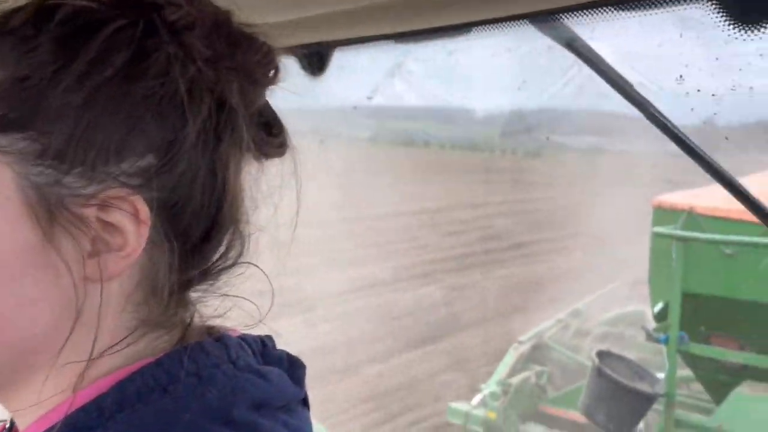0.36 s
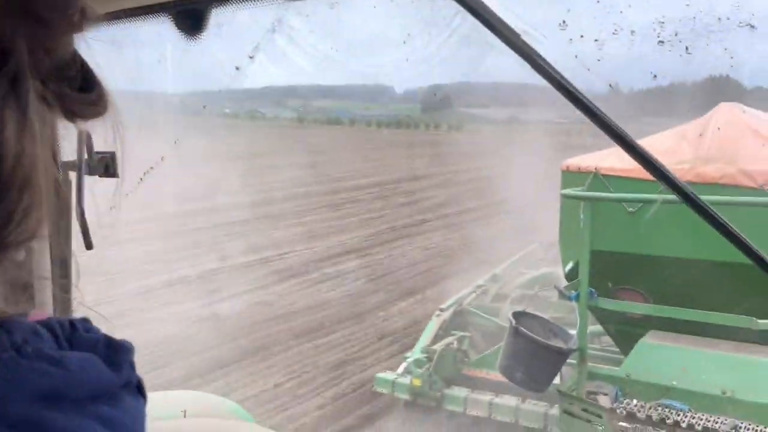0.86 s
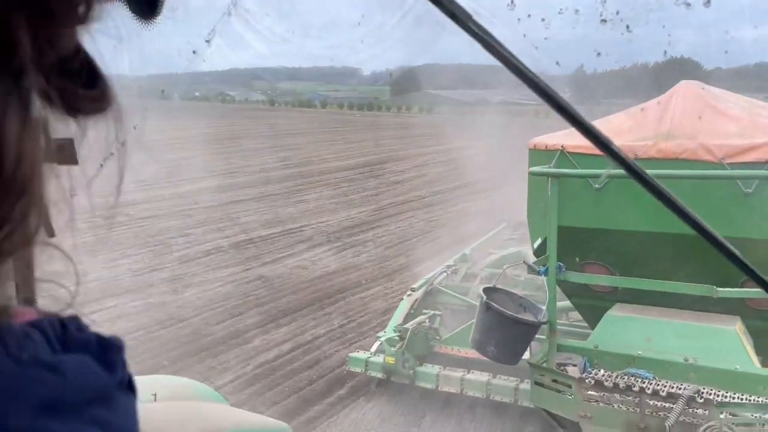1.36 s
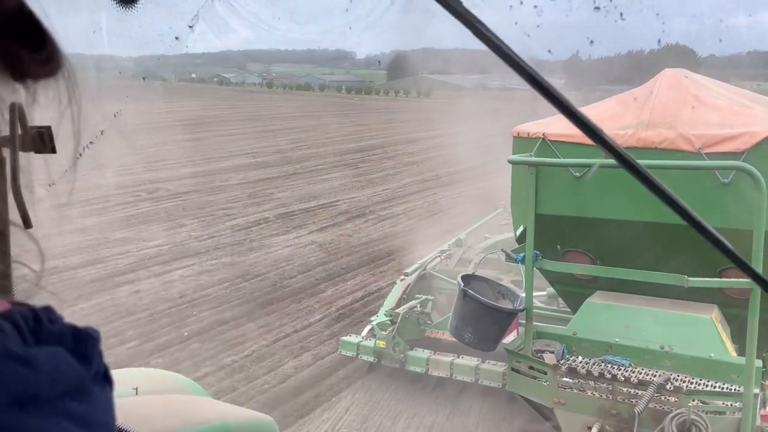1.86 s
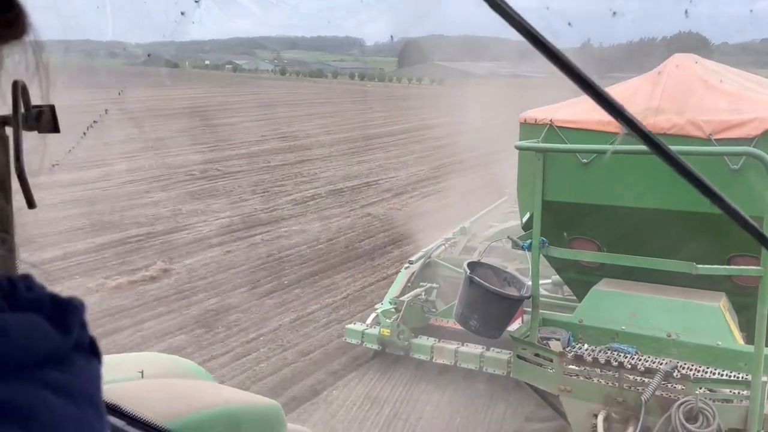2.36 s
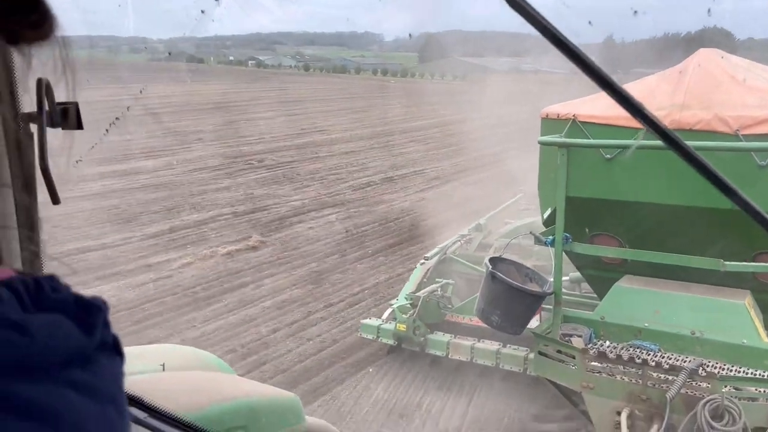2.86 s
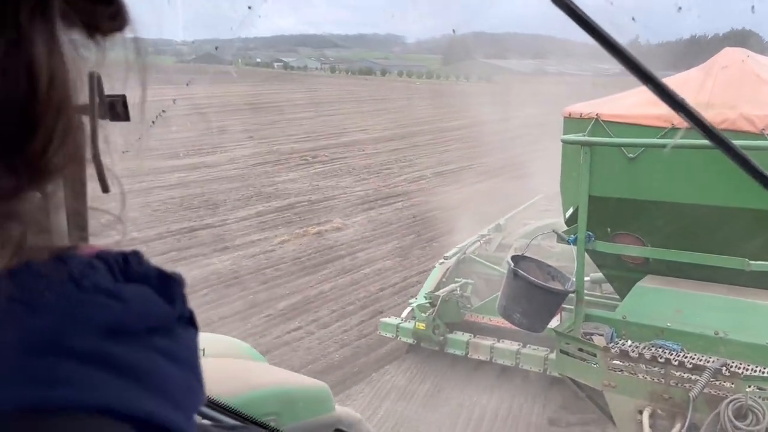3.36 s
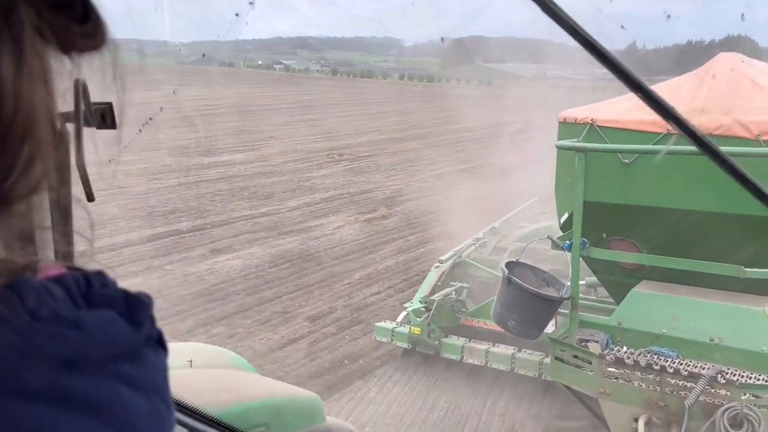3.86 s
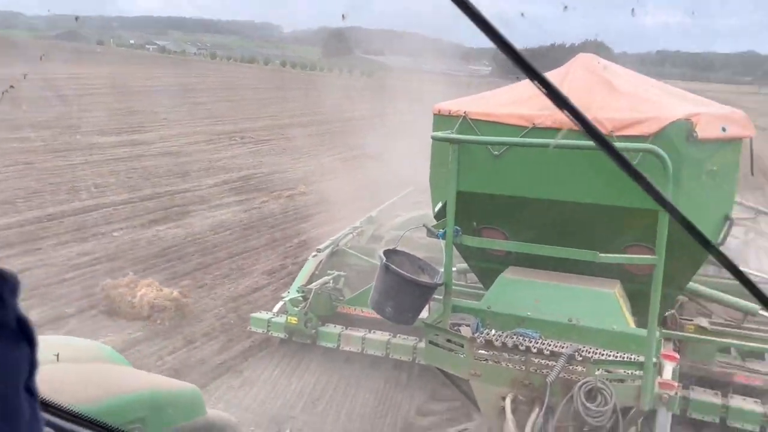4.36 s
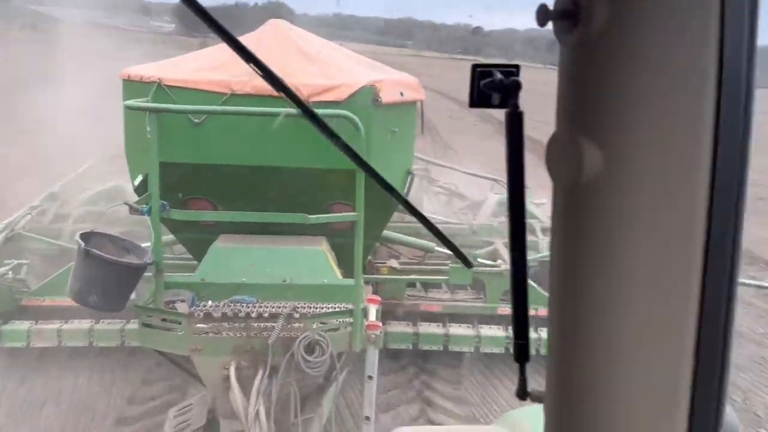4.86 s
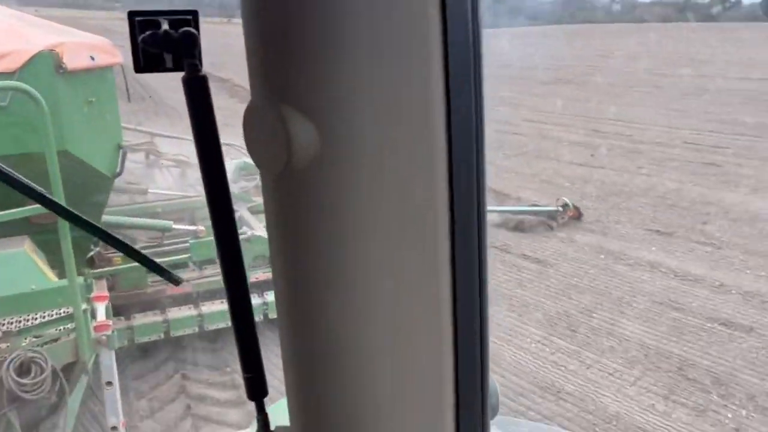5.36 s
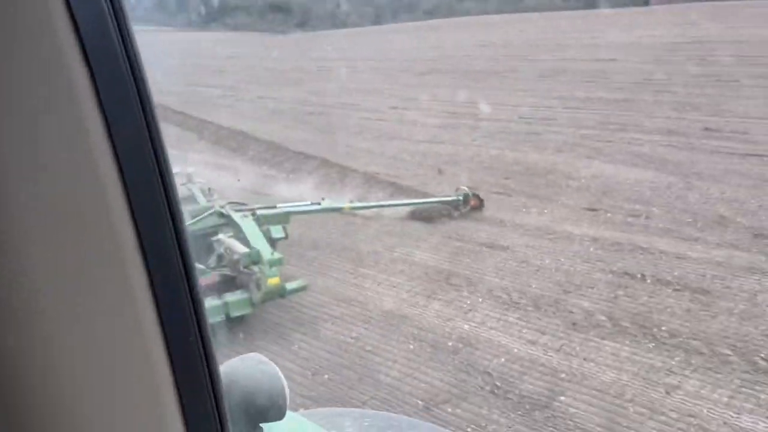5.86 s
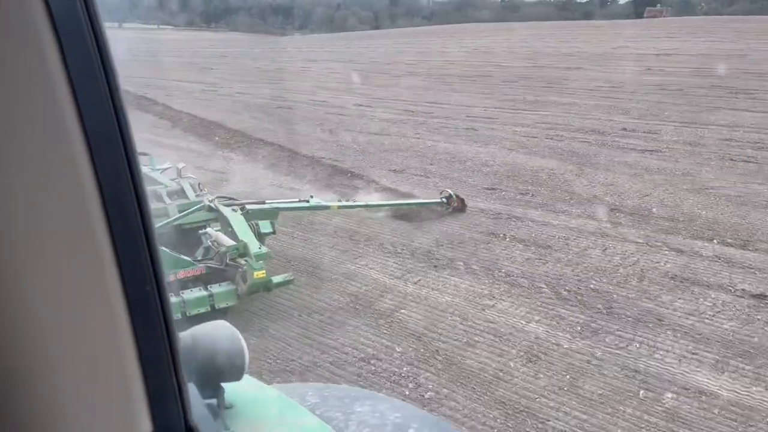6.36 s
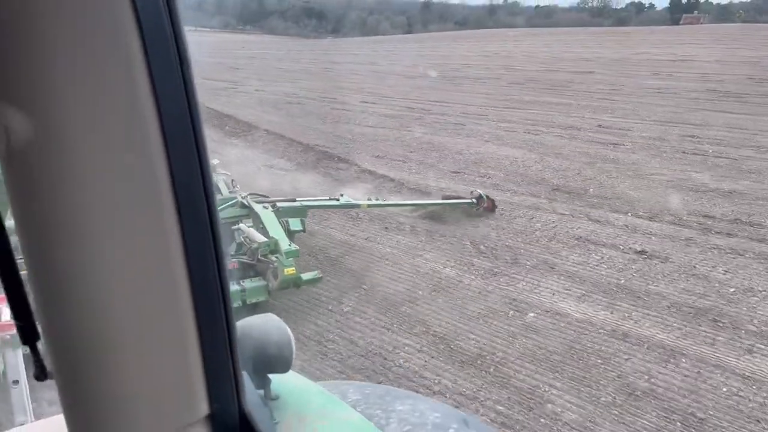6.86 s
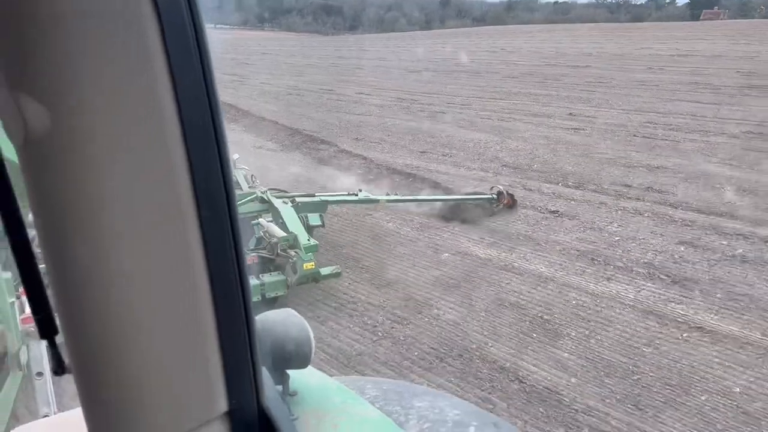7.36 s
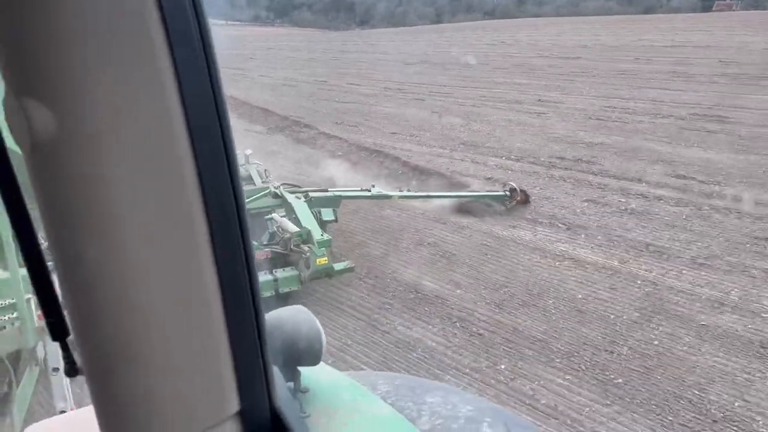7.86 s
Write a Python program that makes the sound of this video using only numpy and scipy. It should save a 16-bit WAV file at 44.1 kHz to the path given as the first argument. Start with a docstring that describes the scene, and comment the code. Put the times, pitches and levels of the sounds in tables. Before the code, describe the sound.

A deep, even engine boom fills a tractor cab, layered with blower hum, shifting gear whines and faint rattling panels as it works a field.

```python
"""A six-cylinder diesel drones under load in a closed tractor cab while it pulls a seed drill.
Engine, blower and whines are sines that waver by chance; the engine's pitch also carries pumps and gears.
The whines swell and fade as the phone moves through standing waves. The frame rumbles and the cab rings,
both as shaped noise, and loose trim rattles as short fading rings. Around five seconds the phone turns
to the other window, which shifts the balance of left and right."""
import sys
import numpy as np
from scipy import signal
from scipy.fft import irfft, next_fast_len
from scipy.io import wavfile
from scipy.ndimage import uniform_filter1d

SR = 44100
rng = np.random.default_rng(int(sys.argv[2]) if len(sys.argv) > 2 else 0)


def generate_wav(sig):
    """Save sig (samples, or channels by samples) to the path in sys.argv[1] as 16-bit PCM at SR."""
    pcm = np.round(np.clip(np.atleast_2d(sig).T, -1, 1) * 32767).astype(np.int16)
    wavfile.write(sys.argv[1], SR, pcm)


def invert_db(level):
    """Linear amplitude ratio for a level in decibels (20 dB per decade), elementwise."""
    return 10 ** (np.asarray(level, dtype=float) / 20)


N = 363825
T = np.arange(N) / SR


def curve(table):
    """Columns of a time table, joined by straight lines."""
    time_s, *columns = np.transpose(table)
    return [np.interp(T, time_s, column) for column in columns]


def walk(rate_hz):
    """A random level that takes a new value every 1 / rate_hz s, smoothed twice; spread near 1."""
    hold = int(SR / rate_hz)
    steps = np.repeat(rng.standard_normal(N // hold + 1), hold)
    smooth = uniform_filter1d(uniform_filter1d(steps, hold), hold)
    return 1.43 * smooth[:N]


def tone(cycles, gain, pan_db, lead):
    """A sine of given rms in two microphones: left minus right pan_db, left ahead by lead radians."""
    side = np.array([[.5], [-.5]])
    phase = 2 * np.pi * (cycles + rng.random()) + side * lead
    return np.sqrt(2) * gain * invert_db(side * pan_db) * np.sin(phase)


def ports():
    """Pitch axis, and how a shared and an opposed noise reach the left and right microphones."""
    # how the two microphones hear noise: pitch_hz, left_minus_right_db, likeness (0-1), left_lead_radians
    hearing = [(59.7, 3, 0.95, 0), (110, 1, 0.99, 0.1), (151, -1, .86, 0.1), (222, -1.5, .92, 0.43),
               (325, -3.5, 0.61, 0), (453, 1.5, 0.8, -1), (614, -2.5, .3, -0.65), (900, -0.5, 0.1, 1.8),
               (1510, -3.5, 0.4, 3.5), (1860, 2, .62, 7), (3520, 1.5, .5, 7), (4940, 5.5, 0.3, 6.5),
               (7340, 1.5, .6, 3.5), (7790, -1.5, 1, 3), (8770, 0.5, 1, 3), (9540, 0, .5, 2),
               (11000, 0, 0.98, 0.5), (13000, 0, 0.99, 0.5), (14000, 0.5, .5, -3.5)]
    hz = np.maximum(np.fft.rfftfreq(next_fast_len(N), 1 / SR), 1)
    port_hz, *columns = np.transpose(hearing)
    pan_db, like, lead = (np.interp(np.log(hz), np.log(port_hz), column) for column in columns)
    like = np.clip(like, 0, 1)
    sign = np.array([[1], [-1]])
    ear = invert_db(sign * pan_db / 2) * np.exp(.5j * sign * lead)
    return hz, ear * np.sqrt(1 + like), sign * ear * np.sqrt(1 - like)


def stereo_noise(gain, mics):
    """Noise of given gain per root Hz, as alike left and right as the microphones make it."""
    hz, shared, opposed = mics
    size = next_fast_len(N)
    real, imag = rng.standard_normal((2, 2, len(hz)))
    mid, side = (real + 1j * imag) * gain(hz) * np.sqrt(size * SR / 8)
    return irfft(mid * shared + side * opposed, size)[:, :N]


def rumble(cycles, mics):
    """Half-octave noise bands sway apart; the upper ones also jolt together and throb once per six firings."""
    # rumble of frame and panels, fan rush on top: pitch_hz, level_db (per Hz)
    spectrum = [(20, -71), (28, -62.5), (35, -52), (70, -50), (160, -50.5), (345, -56), (375, -58),
                (600, -64), (1000, -68.5), (2200, -73.5), (4300, -79.5), (6000, -87.5), (8000, -92),
                (11000, -93.5), (13300, -100), (15200, -106)]
    out = 0
    knot_hz, knot_db = np.transpose(spectrum)
    shared_db = .4 * np.cos(2 * np.pi * cycles / 6) + .6 * walk(5)
    for band in range(19):
        def gain(hz):
            # neighbouring bands fade into each other at constant power
            share = np.cos(np.pi / 2 * np.clip(2 * np.log2(hz / 31.25) - band, -1, 1))
            return share * invert_db(np.interp(np.log(hz), np.log(knot_hz), knot_db))
        sway_db = .3 * walk(1.5) + .7 * walk(5) + 0.93 * walk(11)
        sway_db = sway_db + shared_db * (band > 7)  # bands from 500 Hz up
        out = out + invert_db(sway_db) * stereo_noise(gain, mics)
    return out


def cab(turn, load, mics):
    """Cab resonances: peaks of noise that waver one by one; load and the phone's turn shift their balance."""
    # resonances: pitch_hz, width_hz, level_db (per Hz), gained_under_full_load_db, gained_after_turn_db
    resonances = [(104.5, 14, -40, -1.5, 1), (137.5, 24, -45, 2, -4), (214.6, 25, -48.5, 3.5, -5),
                  (245.3, 25, -54, 10, 0.5), (328.2, 40.4, -53.5, 8, -1), (553, 83, -61.5, -3, -2),
                  (743, 170, -65.5, -3, -10), (1111, 86, -67, -2, -9.5), (1472, 270, -70, 0, -0.5),
                  (1874, 200, -72, 0.5, -9), (2840, 270, -78, -1.5, -5.5), (4760, 320, -83, -1, -2),
                  (7870, 150, -88.5, 1, -0.5), (8700, 350, -87, 2, -4), (9600, 200, -91.5, -1.5, 0.5)]
    out = 0
    for mode_hz, width_hz, level_db, load_db, turn_db in resonances:
        def peak(hz):
            return 1 / np.sqrt(1 + (2 * (hz - mode_hz) / width_hz) ** 4)
        ring = stereo_noise(peak, mics)
        out = out + ring * invert_db(level_db + load_db * load + turn_db * turn + 1.4 * walk(4))
    return out


def trim(count):
    """Loose panels: a few louder knocks among many faint rattles, each a short buzzing ring with a soft onset."""
    # louder knocks: start_s, pitch_hz, level_db, time_to_fall_60_db_s
    knocks = [(1.478, 1354, -30, 0.12), (3.19, 1933, -29, .05), (3.19, 2770, -36, .04),
              (3.735, 1930, -31.5, 0.17), (4.35, 5140, -38, 0.063), (5.45, 1583, -34.5, 0.48),
              (6.42, 1057, -32, 0.14), (7.27, 4760, -39, 0.06), (7.27, 5350, -42, 0.049)]
    chance = rng.random((count + len(knocks), 5))
    rattles = []
    for when, pitch, loudness, length, _ in chance[:count]:
        level_db = -39 - 17 * pitch + 2.9 * np.log(loudness)
        rattles.append((when * T[-1], 1000 * 6.5 ** pitch, level_db, 0.033 + 0.22 * length ** 2))
    out = np.zeros((2, N + SR // 2))
    t = T[:SR // 6]  # every ring is cut off after a sixth of a second
    for (start_s, hz, level_db, t60_s), pan in zip(knocks + rattles, chance[:, 4]):
        envelope = invert_db(level_db - 60 * t / t60_s) * (1 - np.exp(-t / 0.0021))
        buzz = 0.8 * np.sin(2 * np.pi * (25 + 40 * pan) * t)
        ring = envelope * np.sin(2 * np.pi * hz * t + buzz)
        start = int(start_s * SR)
        out[:, start:start + len(t)] += ring * invert_db(np.array([[1], [-1]]) * (6.5 * pan - 3))
    return out[:, :N]


def whines(cycles, turn):
    """Pump and gear whines follow the engine, whistles do not; each rests low and rises on soft plateaus."""
    # one row for each pump harmonic, gear mesh and whistle in turn: resting_db,
    # left_minus_right_db and left_lead_radians before the turn, the same two after it
    whine_rows = [(-55, 6.5, 0.5, 0.5, -1.0), (-62, -4.5, 2.3, 4, 0.2), (-53, -6, 0, 2.0, 1.9),
                  (-53, -5.0, -2, -3.0, -1.8), (-63, 4, -0.5, 4.5, 0.6), (-66, -1, -0.5, 7.0, -0.91),
                  (-63.5, -3, 0, 0.5, 0.1), (-58.5, -2.5, -0.6, -1, 1.9), (-76, -0.5, 2, 3.0, 0.8),
                  (-46.5, 0.5, -1.2, 3.5, 1.5), (-62.5, 1, 0.4, -7.5, -0.84),
                  (-60.5, 0, 0.5, 0, 0.1),(-56, -1.5, -1.7, -1, 1.5), (-71, -3, 1.14, 0.5, 1.8),
                  (-57.5, 0, -1, -5, 1.5), (-66.5, -1.5, 2.5, -4.5, -1), (-64, -2.5, 0, 0.5, 0.93),
                  (-79.5, 2.5, 1.5, 3.0, 0.2)]
    # swells while the phone sits in a crest of a standing wave: start_s, length_s, pitch_hz (at cruise), level_db
    swells = [(0, 1.34, 597, -46), (0, 1.5, 1439, -47.5), (0, 1.84, 1171, -49), (0, 1, 2159, -53),
              (0, 0.81, 3239, -52), (0, 1.2, 1080, -56), (0, 1.2, 2519, -59), (.05, 2.3, 1519, -47.5),
              (.5, 0.23, 2365, -53), (0.152, 0.79, 1799, -43), (.65, .65, 4124, -57), (.85, .2, 2365, -48),
              (1, 2.98, 560, -39), (1, .26, 1799, -52), (1, .65, 1092, -50), (1.25, .11, 2365, -44.5),
              (1.5, 1, 4124, -61), (1.55, .85, 2159, -57), (1.55, .85, 1799, -45), (1.65, 0.26, 1439, -48),
              (1.7, 1.3, 2365, -57), (1.75, 2.83, 1092, -49), (2, 0.85, 2879, -58), (2.45, 1.73, 1171, -49),
              (3.25, 1.1, 1799, -49.5), (3.65, .5, 1519, -48), (4.098, 0.18, 1799, -50.5),
              (4.3, 0.26, 560, -40), (4.402, 1.4, 1171, -52.5), (4.68, .36, 2365, -46),
              (4.85, 0.38, 2159, -50), (4.848, 0.68, 560, -37.5), (5.2, 1, 1092, -48),
              (5.301, 1.4, 2879, -58), (5.35, 0.34, 2365, -42), (5.752, 0.76, 3239, -54.5),
              (5.901, .6, 2365, -53.5), (5.95, 1.71, 597, -45.5), (6.05, 0.39, 2519, -49.5),
              (6.148, 2.24, 1439, -50), (6.1, 2.2, 649, -51), (6.2, 1.15, 1194, -55),
              (6.5, 0.97, 1519, -44), (6.5, 1, 2519, -59), (6.6, .7, 2159, -58), (6.7, 1.5, 2879, -57),
              (6.902, 0.99, 3239, -57), (7.502, .45, 1519, -50), (7.55, .5, 2519, -54.5),
              (7.6, .18, 2365, -51), (8.05, 0.31, 1519, -45)]
    # gear meshes: multiple of the firing rate
    meshes = (5.898, 6.283, 6.833, 11.49, 12.33, 12.57, 15.99)
    # whistles that hold their pitch whatever the engine does: pitch_hz
    whistles_hz = (2365, 4124)
    pump, pump_count = 3.788, 9  # hydraulic pump: multiple of the firing rate, harmonics with a row
    cruise_hz, edge_s = 95, 0.033  # firing rate that the swells' pitches refer to, softness of their edges

    out = 0
    coarse = T[::64]
    orders = np.append(pump * np.arange(1, pump_count + 1), meshes)
    phases = [order * cycles for order in orders] + [hz * T for hz in whistles_hz]
    names_hz = np.append(orders * cruise_hz, whistles_hz)
    gains = invert_db(np.array(whine_rows)[:, :1]) * np.ones(len(coarse))
    for start_s, length_s, hz, level_db in swells:
        since = coarse - start_s
        plateau = np.tanh(since / edge_s) - np.tanh((since - length_s) / edge_s)
        nearest = np.argmin(abs(names_hz - hz))
        gains[nearest] += invert_db(level_db) * plateau / 2
    for phase, gain, (_, pan_db, lead, pan2_db, lead2) in zip(phases, gains, whine_rows):
        gain = np.interp(T, coarse, gain) * invert_db(1.3 * walk(14) + 0.9 * walk(5))
        pan_now_db = pan_db + (pan2_db - pan_db) * turn
        lead_now = lead + (lead2 - lead) * turn
        out += tone(phase + 0.036 * walk(20), gain, pan_now_db, lead_now)
    # the pump's upper harmonics come and go by chance
    for k in range(pump_count + 1, 2 * pump_count):
        gain = invert_db(-52.5 - 1.3 * k + 2.9 * walk(4.7))
        out += tone(k * pump * cycles + .15 * walk(20), gain, 3, 0.67)
    return out


def blower(turn):
    """The blades hum at a speed of their own, apart from the engine's, and waver in level."""
    # blower blades: time_s, pitch_hz, level_db
    blades = [(0, 293, -28), (.55, 293.7, -27), (1.6, 288.7, -27), (2.25, 289.6, -27.5), (2.95, 287.2, -26),
              (3.7, 288.4, -28.5), (4.8, 288.4, -26), (5.5, 287.2, -25), (6.4, 287.7, -25.5),
              (7.2, 289.7, -26), (8.25, 292.5, -28)]
    hz, level_db = curve(blades)
    gain = invert_db(level_db + 1.66 * walk(7) + 0.55 * walk(2.5))
    return tone(np.cumsum(hz) / SR, gain, -4.2 + 4.3 * turn, -0.41)


def engine(cycles, boom_db, turn, load):
    """The firings boom, shaken by the ground; unlike cylinders add tones that grow under load."""
    # unlike cylinders: multiple of the firing rate
    uneven_orders = (.5, 1.5, 2)
    # one row for each of those: level_db, gained_under_full_load_db, wander_db
    uneven_levels = [(-28, 1.3, 2.1), (-40.5, 10, 2.5), (-40.5, 9, 2.5)]
    # steady tones of the engine: multiple of the firing rate
    steady_orders = (.25, .688, 5 / 6, 7 / 6, 2.289, 2.5, 3, 4)
    # one for each of those: level_db
    steady_db = [-51.5, -43, -36, -37.5, -41, -44.5, -41, -55]

    pan_db = -1.4 + 1.4 * turn
    lead = -.14 + .07 * turn
    boom_gain = invert_db(boom_db + .4 * walk(9) + .5 * walk(4))
    out = tone(cycles + 0.013 * walk(11), boom_gain, pan_db, lead)
    for order, (level_db, load_db, wander_db) in zip(uneven_orders, uneven_levels):
        gain = invert_db(level_db + load_db * load + wander_db * walk(3.5))
        out += tone(order * cycles, gain, pan_db * order ** 2 / 2, lead * order)
    for order, level_db in zip(steady_orders, steady_db):
        out += tone(order * cycles, invert_db(level_db + 2.8 * walk(3)), pan_db, lead)
    return out


def scene():
    """Engine, blower, whines and rattling trim over the rumble and ring of the cab."""
    # engine: time_s, firing_rate_hz, boom_db
    firing = [(0, 96, -13.5), (.6, 96.84, -10), (.8, 96, -10), (1, 94.07, -9), (1.2, 93.54, -10.5),
              (2, 95.05, -10.5), (2.4, 94.14, -10), (2.75, 93.35, -10), (3.4, 94.4, -10.5),
              (3.65, 93.95, -11), (4.25, 94.87, -10), (4.75, 94.5, -11), (5, 93.7, -10.5),
              (5.4, 93.5, -9.5), (5.6, 94.43, -9), (5.8, 94, -9), (6.35, 95.05, -10), (6.6, 95.8, -11),
              (6.8, 95.65, -10.3), (7.2, 96.27, -9.5), (7.4, 95.87, -11), (7.6, 96.96, -9.3),
              (8.25, 97.6, -12)]
    # how hard the drill drags: time_s, load (0-1)
    drag = [(0, 0.44), (.85, .7), (1.1, 0.1), (2.3, 0.06), (2.6, 0.3), (3.1, 0), (5.55, 0.06), (5.8, 1),
            (6.5, 1), (7.5, 0.8), (8.25, 1)]
    hz, boom_db = curve(firing)
    load, = curve(drag)
    cycles = np.cumsum(hz) / SR  # firings so far
    turn_s, turn_spread_s = 5.0, 0.31
    turn = .5 + .5 * np.tanh((T - turn_s) / turn_spread_s)  # 0 before the phone turns, 1 after
    machines = engine(cycles, boom_db, turn, load) + blower(turn) + whines(cycles, turn)
    mics = ports()
    return machines + rumble(cycles, mics) + cab(turn, load, mics) + trim(count=500)


def roll_off(x):
    """The treble ends steeply here."""
    return signal.sosfilt(signal.butter(12, 14330, fs=SR, output="sos"), x)


def record(dry):
    """The phone rounds off the tallest peaks: above 0.7 they bend smoothly towards 0.95."""
    over = np.maximum(abs(dry) - .7, 0)
    soft = dry - np.sign(dry) * (over - .25 * np.tanh(over / .25))
    return roll_off(soft)


dry = scene()
out = record(dry)
generate_wav(out)
```